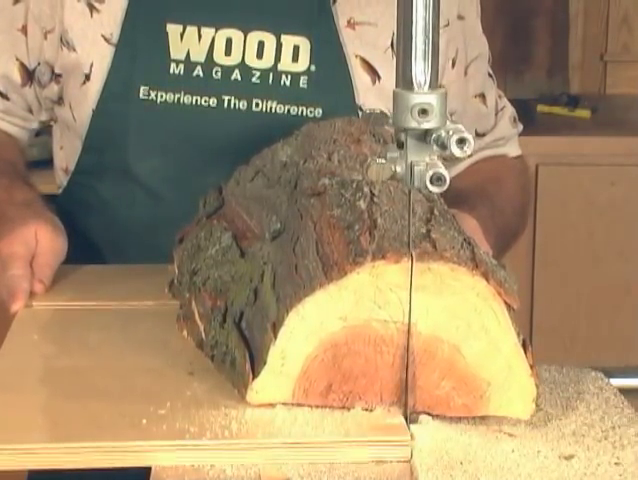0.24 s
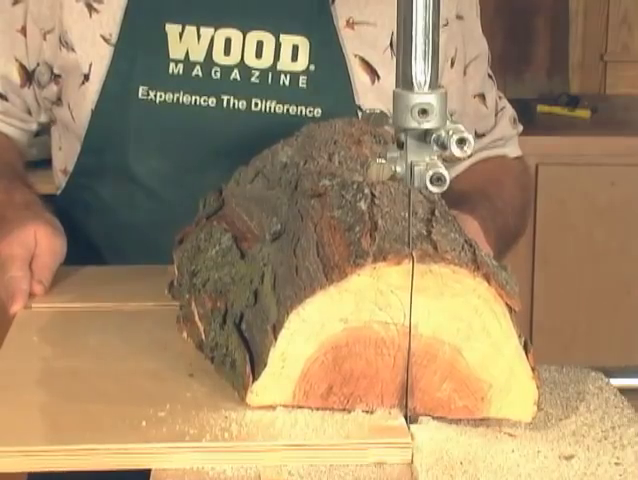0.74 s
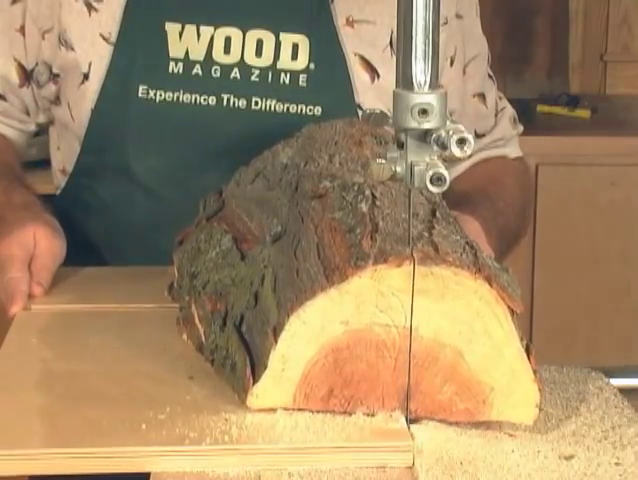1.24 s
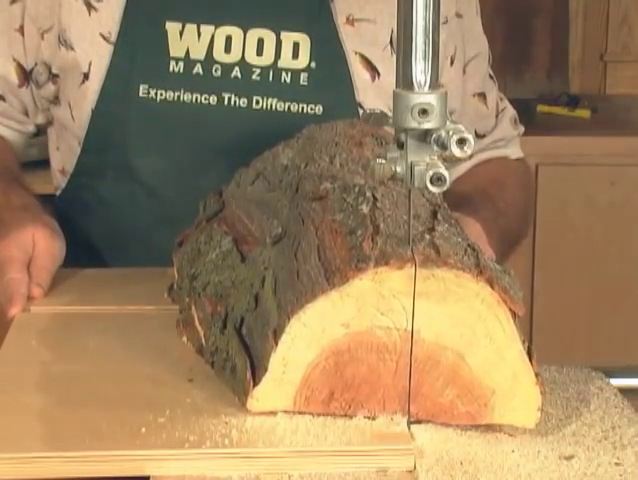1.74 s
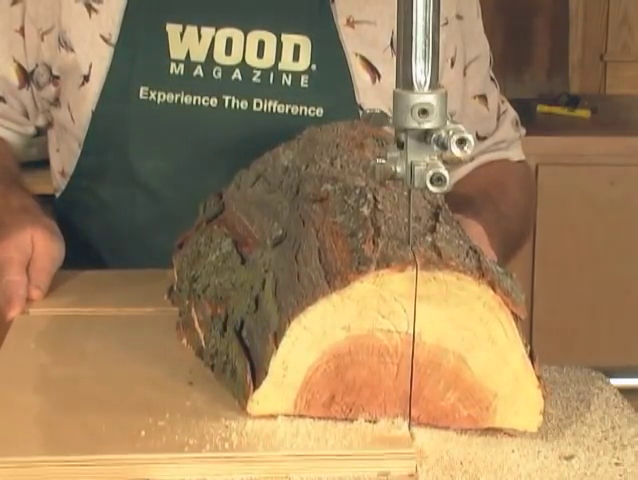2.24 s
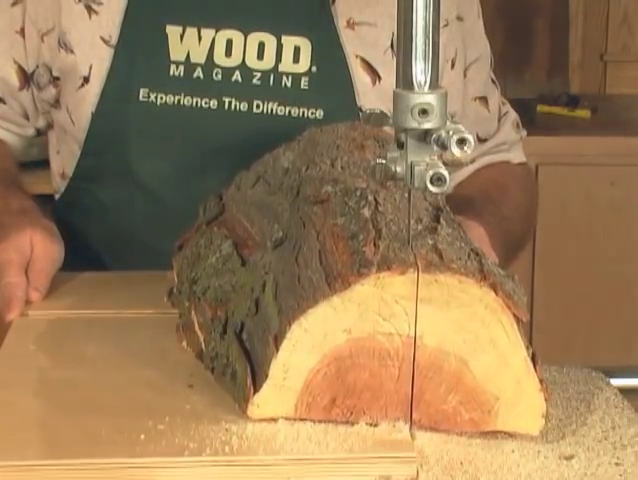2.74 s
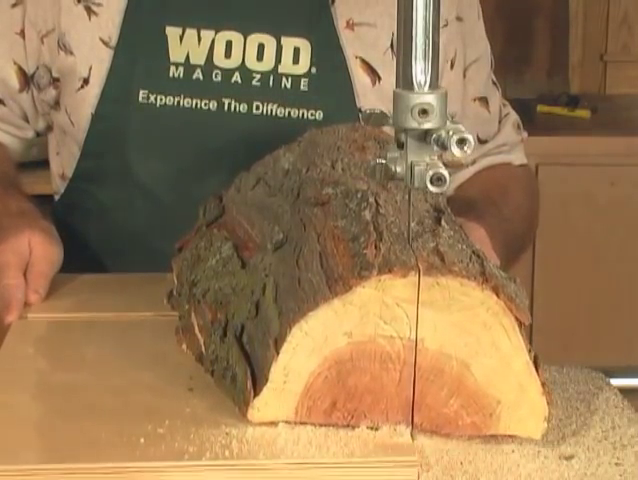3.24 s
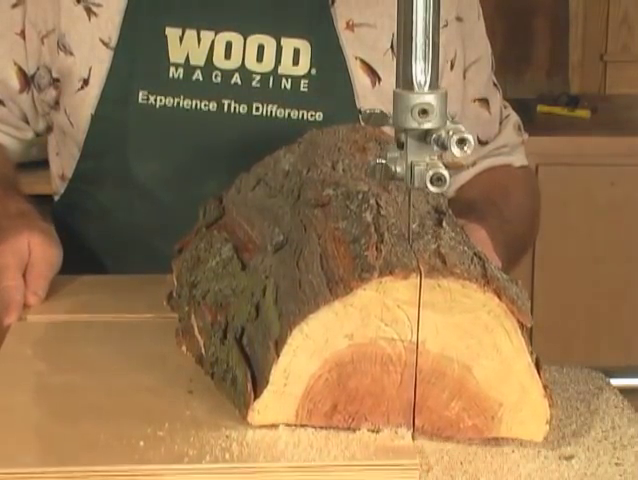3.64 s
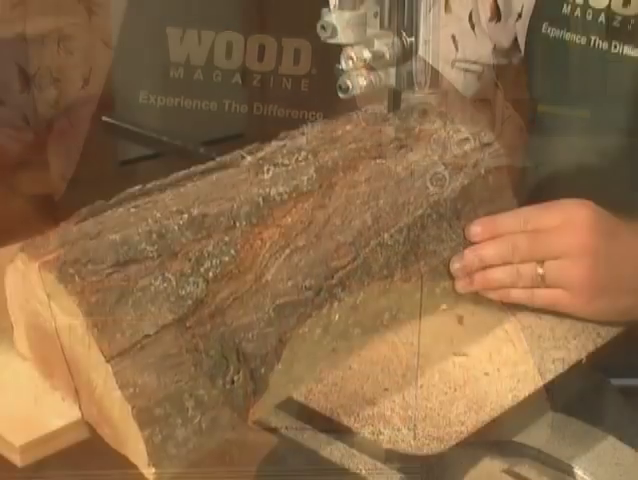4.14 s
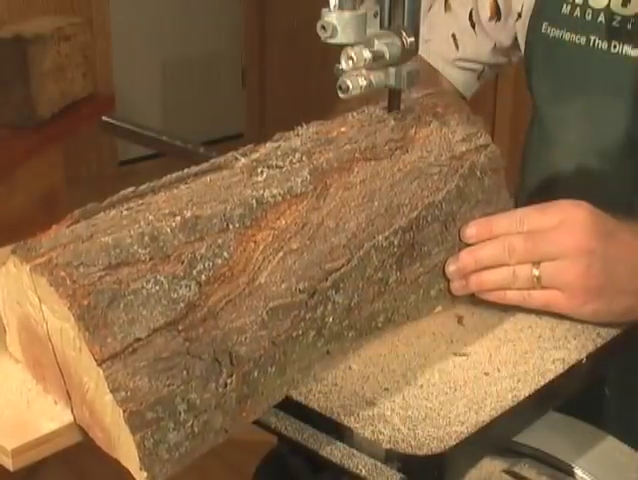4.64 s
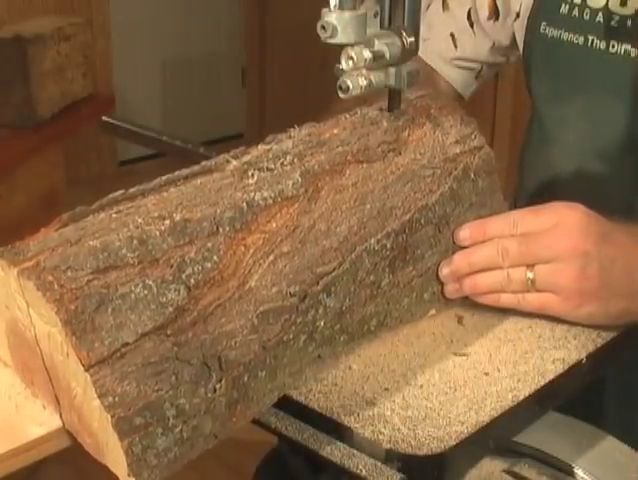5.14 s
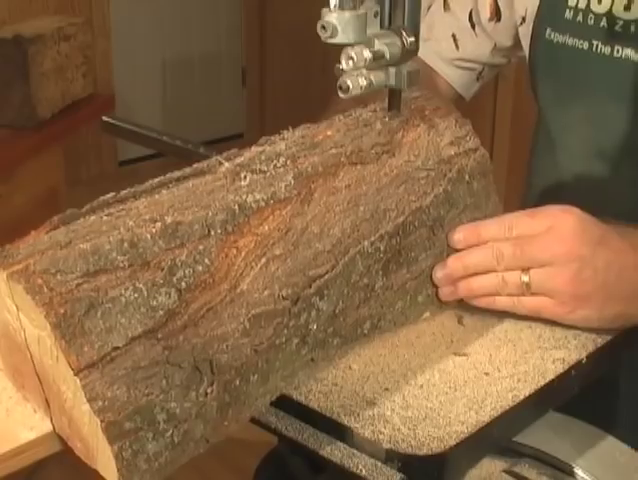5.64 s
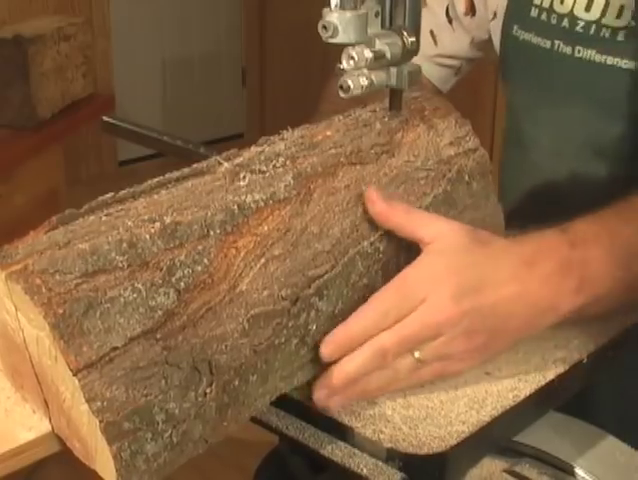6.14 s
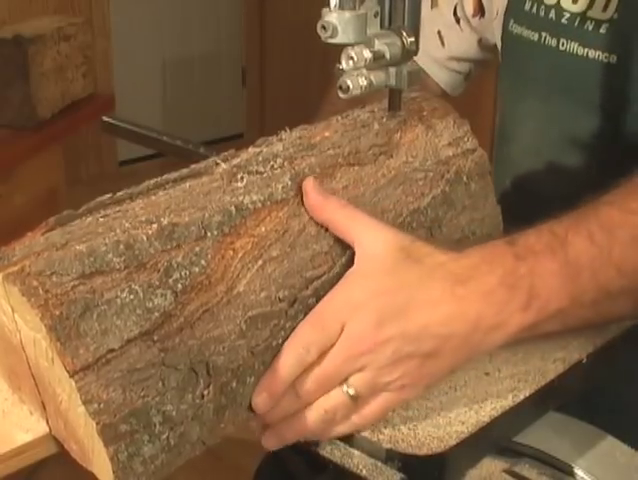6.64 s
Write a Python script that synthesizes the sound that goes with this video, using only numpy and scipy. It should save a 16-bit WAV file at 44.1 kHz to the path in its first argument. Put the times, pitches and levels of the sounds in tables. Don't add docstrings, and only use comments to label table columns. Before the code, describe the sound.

A bandsaw is already cutting a thick log at 0 s and never stops, loud and close in a small workshop, identical in both channels. Until about 4 s it is a dense, midrange-heavy roar of teeth tearing chips, with unsteady machine tones, metallic ringing and a faint throb about five times a second. Tiny splinter pings tick at 0.1, 0.4, 0.5, 2.3-2.6 and 3.1-3.6 s; a short dull table bump lands near 1.4 s. The cut swells gently with each push. From 4.0 to 4.3 s it overlaps with a second perspective: brighter, hissier and sizzling, with less body. A tooth whine climbs from 4 to 4.7 s, over faint low motor hum. Pushes keep the level wavering. Rasps of bark catch at 5.6-5.7, 6.0 and 6.3 s, with a higher fluttering whine around 6-6.2 s and a very soft bump near 6.4 s. Cutting continues to the end, about 7 s.

```python
import sys
import numpy as np
from scipy import signal
from scipy.fft import rfft, irfft, next_fast_len
from scipy.io import wavfile
from scipy.ndimage import uniform_filter1d

SR = 44100
rng = np.random.default_rng(int(sys.argv[2]) if len(sys.argv) > 2 else 0)


def persist_wave(psi):
    counts = np.round(np.clip(psi, -1, 1) * 32767).astype(np.int16)
    wavfile.write(sys.argv[1], SR, np.atleast_2d(counts).T)


def convert_level_to_amplitude(level_db):
    exponent = np.asarray(level_db, float) / 20
    return 10 ** exponent


N = 304731

FRONT_ENDS_S, SIDE_STARTS_S = 4.315, 3.975

# pitch_hz, level_db (per Hz)
FRONT_COLOUR = [(12, -64), (20, -30), (232, -23), (259, -20), (333, -13), (372, -4.5), (416, -9),
                (465, -10), (549, -8), (746, 1), (1010, -8.5), (1670, -3.5), (5540, -18.5), (8410, -22.5),
                (15500, -45)]
SIDE_COLOUR = [(12, -65), (20, -24), (119, -25.5), (274, -16.5), (372, -6), (416, -13.5), (452, -12),
               (549, -9), (789, -7), (1070, -16.5), (1580, -16), (3450, -5), (5090, -2), (10200, -2),
               (15500, -24.5)]
# pitch_hz, width_hz, level_db (over the hiss)
FRONT_MODES = [(267, 24, 2), (513.5, 8.4, 0), (720, 18, -2), (792, 29, -1.5), (834, 39, -2), (1308, 11, 1),
               (1485, 11.6, -5), (1688, 17, 4), (1724, 19, -1), (2218, 74, 2.5), (2284, 50, 4.5),
               (2946, 52, -30), (4080, 240, -2.5), (5027, 113, -2.5), (6430, 130, -0.5), (7470, 63, 6.5),
               (8400, 91, -2), (8485, 90, 9.5), (9040, 94, 8), (10840, 1700, 6.5)]
SIDE_MODES = [(467, 5.3, 13.6), (988, 16, 4.8), (1253, 63, 1.1), (1614, 77, 10.6), (1675, 24, 11),
              (1966, 130, 3), (2133.7, 26, 6.5), (3150, 51, 3), (3745, 180, 2.14), (4335, 278, 5.2),
              (4690, 130, 2), (5040, 220, 5.7), (5460, 300, 0.85), (5930, 320, 1.1), (7400, 44, 2.1),
              (7600, 69, 2.7), (8720, 320, 0.82)]
SPLIT_HZ = (560, 1050, 2700, 7000)
# front_db, side_db
IDLE_DB = (-33.5, -35)
# drone_db, bite_db
TONE_SHARE_DB = (-2.5, -0.7)

# drone_db, bite_db, hiss_db, fizz_db
FRONT_REST_DB = (-22, -18.5, -23.5, -23.5)
SIDE_REST_DB = (-27, -20.5, -20.5, -23.5)
FRONT_SINK = (0.25, 0.064, 0.45, -0.35)
SIDE_SINK = (0.046, 0.27, -0.049, -0.049)
FRONT_FEED = (.3, 1, 0.28, .3)
SIDE_FEED = (0.67, 1, 0.87, 0.25)
# middle_s, length_s, pressure_db, rattle_db
FRONT_PUSHES = [
    (.8, 0.28, 0.5, .5),
    (1.17, 0.12, 1.5, -1),
    (2.1, 0.47, -0.1, 0.5),
    (2.75, 0.27, -0.5, 1),
    (3.0, 0.41, 0.8, -1.5),
    (3.299, 0.19, -1, 1),
    (3.66, 0.16, -0.2, 0.5),
]
SIDE_PUSHES = [(4.15, 0.27, 0.38, 5), (4.46, 0.11, 2.9, -2), (4.76, 0.22, 3.3, 2), (4.97, 0.18, 3.4, 3),
               (5.16, 0.13, 1.8, 3.5), (5.39, 0.23, 3.1, 3), (5.74, 0.24, 2, 2), (6.05, 0.37, 1, 0.5),
               (6.44, 0.38, 1.2, 3), (6.799, .25, 1.9, 5), (6.92, .1, 2.2, -1)]
# turns_hz, weld_pass_s
FRONT_LOOP = (5.4, 2.44)
SIDE_LOOP = (5.6, 5.75)
WELD_DB_PER_S = (.6, .15)

# pitch_hz, unsteadiness_hz
FRONT_TONES = [(369.5, 16), (469.5, 10), (636.5, 12), (766, 14), (953.5, 10), (1521.5, 9), (1707, 12),
               (1846.5, 8), (791, 16)]
SIDE_TONES = [(370, 16), (451.5, 9), (679.5, 14), (795.5, 14), (5026, 40), (7638, 30)]
FRONT_TONES_DB = [-32, -36.5, -32, -30, -36, -35, -33.5, -37, -34]
SIDE_TONES_DB = [-34.5, -40, -34.5, -29.5, -36, -41]
# middle_s, length_s, tone_number, change_db
FRONT_SINGS = [(.58, .15, 5, 6), (.8, .45, 6, 6), (1.22, .25, 5, 7), (2.05, .3, 3, 3), (2.87, .15, 5, 7),
               (3.3, .3, 8, 4), (3.75, .4, 6, 5), (4.1, .45, 6, 7), (3.0, .5, 6, 3)]
SIDE_SINGS = [(4.45, .35, 3, -8), (4.95, .6, 3, 2), (5.4, .3, 3, 3), (5.0, .3, 2, 3), (6.2, .9, 3, -8),
              (6.2, .9, 2, -6)]

# start_s, pitch_hz, peak_db
PINGS = [(.09, 14900, -44), (.1, 7500, -24.5), (.39, 11800, -27), (.5, 8000, -14), (2.25, 4070, -15),
         (2.34, 13100, -42), (2.45, 9670, -28), (2.635, 13800, -39), (2.63, 3250, -14), (3.065, 13200, -32),
         (3.19, 13500, -43), (3.55, 11800, -30)]
# middle_s, peak_db, length_s
KNOCKS = [
    (1.356, -17, 0.0009),
    (6.38, -31.5, .003),
]
# start_s, end_s, from_hz, to_hz, level_db
WHINE_UP = (3.95, 4.68, 790, 1310, -23)
WHINE_CATCH = (5.96, 6.18, 1490, 1655, -16)
# start_s, end_s, level_db
LABOUR = [
    (3.97, 4.26, -47),
    (4.36, 4.67, -47.5),
    (4.85, 5.1, -50),
    (5.15, 5.56, -58),
    (6.32, 6.44, -60),
]
# start_s, length_s, pitch_hz, width_hz, level_db
SCRAPE = [
    (5.625, .015, 4500, 3000, -19),
    (5.722, .02, 3800, 3000, -14),
    (5.985, .018, 2150, 1100, -14),
    (6.012, .02, 2000, 1200, -15),
    (6.265, .02, 1950, 900, -18),
    (6.295, .025, 2000, 900, -18),
]
# start_s, end_s, pitch_hz, width_hz, change_db
SHADING = [(-.2, 1.0, 6680, 2700, 2.5), (4.65, 5.45, 15000, 5000, 4), (5.45, 5.65, 14000, 3000, -2),
           (6, 6.7, 3040, 1000, -3.5), (6.15, 6.6, 9900, 1300, -5), (6.2, 7.1, 8200, 500, 3),
           (6.0, 6.65, 14500, 2000, 0), (6.65, 7.1, 14000, 500, 6.5), (6.65, 7.1, 11200, 1200, 4),
           (4.05, 4.65, 10730, 500, 1), (7, 7.1, 4950, 600, 4), (5, 5.47, 4600, 2200, 1.5),
           (6.3, 6.7, 3240, 600, -2.5)]


def evened(x):
    return x / np.sqrt(np.mean(np.abs(x) ** 2) + 1e-20)


def drift(top_hz, low_hz):
    step = 64
    count = next_fast_len(N // step + 2)
    hz = np.fft.rfftfreq(count, step / SR)
    z = rfft(rng.standard_normal(count)) * (hz > low_hz)
    z = z / np.sqrt(hz + low_hz) / (1 + (hz / top_hz) ** 4)
    return np.interp(np.arange(N) / step, np.arange(count), evened(irfft(z, count)))


def bell(t, middle_s, length_s):
    return np.exp(-(2 * (t - middle_s) / length_s) ** 2)


def colour_db(points, hz):
    point_hz, level_db = np.transpose(points)
    return np.interp(np.log(hz + 1), np.log(point_hz + 1), level_db)


def ring(x, hz, width):
    r = np.exp(-np.pi * width / SR)
    w = 2 * np.pi * hz / SR
    gain = (1 - r * r) / 2
    return signal.lfilter([gain, 0, -gain], [1, -2 * r * np.cos(w), r * r], x)


def cut(rest_db, sink, feed, pushes, start, loop, weld_db_per_s):
    t = np.arange(N) / SR
    shapes = [bell(t, s, length) for s, length, _, _ in pushes]
    pressure_db, rattle_db = np.transpose(pushes)[2:] @ shapes
    drone, bite, hiss, fizz = (
        db + per_s * (t - start) + share * pressure_db
        for db, per_s, share in zip(rest_db, sink, feed))
    loop_hz, weld_s = loop
    thump_db = weld_db_per_s * (t - start) * np.cos(2 * np.pi * loop_hz * (t - weld_s))
    return drone + rattle_db + thump_db, bite, hiss, fizz


def teeth(tooth_hz, spread_db, share):
    tooth = (np.cumsum(np.full(N, tooth_hz / SR)) + rng.random()).astype(int)
    chip_size = convert_level_to_amplitude(spread_db * rng.standard_normal(tooth[-1] + 1))[tooth]
    share = np.clip(share, 0, 1)
    return rng.standard_normal(N) * evened(share * evened(chip_size) + 1 - share)


def loop_throb(loop_hz, weld_s):
    turns = (np.arange(N) / SR - weld_s) * loop_hz
    bump = np.exp(2.0 * np.cos(2 * np.pi * turns))
    turn_strength = np.clip(1 + 0.84 * drift(1.2, 0.35), 0, 2)
    return evened(bump - bump.mean()) * turn_strength


def saw(cut_db, colour, modes, idle_db, tooth_hz, loop_hz, weld_s, throb_db, flicker_db, waver_db):
    noise = teeth(tooth_hz, spread_db=2.0, share=0.49)
    shaking = rng.standard_normal(2 * N)
    for k, (hz, width, db) in enumerate(modes):
        drive = shaking[k * 9000:][:N]
        noise = noise + convert_level_to_amplitude(db + waver_db * drift(15.0, 1.1)) * ring(drive, hz, width)

    size = next_fast_len(N, True)
    hz = np.fft.rfftfreq(size, 1 / SR)
    z = rfft(noise, size) * convert_level_to_amplitude(colour_db(colour, hz))
    above = [1] + [1 / (1 + (edge / (hz + 1)) ** 10) for edge in SPLIT_HZ] + [0]
    drone, bite, hiss, fizz = cut_db
    levels_db = (idle_db, drone + TONE_SHARE_DB[0], bite + TONE_SHARE_DB[1], hiss, fizz)
    shake_db = throb_db * loop_throb(loop_hz, weld_s) + flicker_db * drift(40.0, 3.8)
    out = np.zeros(N)
    for k, depth in enumerate((0.05, 0.19, 0.82, 0.85, 0.6)):
        part = evened(irfft(z * (above[k] - above[k + 1]), size)[:N])
        out += part * convert_level_to_amplitude(levels_db[k] + depth * (shake_db + 0.83 * drift(63.0, 7.4)))
    return out


def unsteady(hz, blur_hz, steady):
    angle = 2 * np.pi * np.cumsum(hz * np.ones(N)) / SR
    in_step = drift(blur_hz, blur_hz / 4)
    off_step = drift(blur_hz, blur_hz / 4)
    return evened((steady + in_step) * np.cos(angle) + off_step * np.sin(angle))


def tones(rows, levels_db, drone_db, sings, steady):
    t, out = np.arange(N) / SR, np.zeros(N)
    for k, ((hz, blur_hz), db) in enumerate(zip(rows, levels_db)):
        for s, length, tone, change_db in sings:
            if tone == k:
                db = db + change_db * bell(t, s, length)
        if SPLIT_HZ[0] < hz < SPLIT_HZ[1]:
            db = db + 1.14 * drone_db
        out += convert_level_to_amplitude(db) * unsteady(hz, blur_hz, steady)
    return out


def pings():
    t, out = np.arange(2000) / SR, np.zeros(N)
    for s, hz, db in PINGS:
        out[round(s * SR):][:len(t)] += convert_level_to_amplitude(db) * np.sin(2 * np.pi * hz * t) * np.exp(-t / 0.006)
    return out


def knocks():
    t = np.arange(N) / SR
    return sum(convert_level_to_amplitude(db) * bell(t, s, length) for s, db, length in KNOCKS)


def whine(glide, bend, fade_db, beat_hz, beat_db, blur_hz, steady):
    start, end, from_hz, to_hz, db = glide
    t = np.arange(N) / SR
    progress = np.clip((t - start) / (end - start), 0, 1)
    pulse_db = beat_db * (np.cos(2 * np.pi * beat_hz * (t - start)) - 1)
    level_db = db + fade_db * progress ** 2 + pulse_db
    fade = np.clip(np.minimum(t - start, end - t) / 0.048, 0, 1)
    pitch_hz = from_hz + (to_hz - from_hz) * progress ** bend
    return unsteady(pitch_hz, blur_hz, steady) * convert_level_to_amplitude(level_db) * fade


def motor():
    hum_hz, rest_db, swell_s = 120.4, -61, 0.08
    t = np.arange(N) / SR
    load = sum(convert_level_to_amplitude(db) * np.clip(np.minimum(t - a, b - t) / swell_s + 0.5, 0, 1) for a, b, db in LABOUR)
    return np.sqrt(2) * np.sin(2 * np.pi * hum_hz * t) * (convert_level_to_amplitude(rest_db) + load)


def scrape():
    grit, out = rng.standard_normal(N), np.zeros(N)
    for s, length, hz, width, db in SCRAPE:
        t = np.arange(N) / SR - s
        shape = np.clip(t / 0.0024, 0, 1) * np.exp(-np.abs(t) / length)
        out += convert_level_to_amplitude(db) * evened(ring(grit, hz, width)) * shape
    return out


def workshop(x, ripple_db, patchy_db):
    hz, t, z = signal.stft(x, SR, nperseg=1024, noverlap=768)
    high = np.clip(hz / 7000, 0.1, 2.2)[:, None]
    field_db = ripple_db * high * rng.standard_normal((len(hz), 1))
    patches = rng.standard_normal((len(t), len(hz))).T
    patches = uniform_filter1d(patches, size=11, axis=0)
    patches = uniform_filter1d(patches, size=4, axis=1)
    field_db = field_db + patchy_db * high * evened(patches)
    for start, end, centre_hz, width_hz, db in SHADING:
        present = np.clip(np.minimum(t - start, end - t) / 0.079 + 0.5, 0, 1)
        field_db += db * bell(hz[:, None], centre_hz, width_hz) * present
    return signal.istft(z * convert_level_to_amplitude(field_db), SR, nperseg=1024, noverlap=768)[1][:N]


def scene():
    t = np.arange(N) / SR
    front_db = cut(FRONT_REST_DB, FRONT_SINK, FRONT_FEED, FRONT_PUSHES, 0, FRONT_LOOP, WELD_DB_PER_S[0])
    front = saw(front_db, FRONT_COLOUR, FRONT_MODES, IDLE_DB[0], 1705, *FRONT_LOOP,
                throb_db=0.23, flicker_db=0.5, waver_db=0.25)
    front += tones(FRONT_TONES, FRONT_TONES_DB, front_db[0] + 21.0, FRONT_SINGS, steady=1.3)

    side_db = cut(SIDE_REST_DB, SIDE_SINK, SIDE_FEED, SIDE_PUSHES, SIDE_STARTS_S, SIDE_LOOP,
                  WELD_DB_PER_S[1])
    side = saw(side_db, SIDE_COLOUR, SIDE_MODES, IDLE_DB[1], 1617, *SIDE_LOOP,
               throb_db=0.03, flicker_db=0.5, waver_db=2.0)
    side += tones(SIDE_TONES, SIDE_TONES_DB, side_db[0] + 25.0, SIDE_SINGS, steady=0.57)
    side += whine(WHINE_UP, bend=0.55, fade_db=-6, beat_hz=5, beat_db=0.5, blur_hz=60, steady=0.9)
    side += whine(WHINE_CATCH, bend=0.9, fade_db=-5, beat_hz=18, beat_db=4, blur_hz=30, steady=1.5)
    side += motor() + scrape()

    front_fade = np.clip((FRONT_ENDS_S - t) / 0.0044, 0, 1)
    side_fade = np.clip((t - SIDE_STARTS_S) / 0.047, 0, 1)
    room = workshop(front * front_fade + side * side_fade, ripple_db=1.2, patchy_db=0.92)
    return np.tile(room + knocks() + pings(), (2, 1))


def top_cut(x):
    return signal.sosfilt(signal.butter(12, 15660, fs=SR, output="sos"), x)


def record(dry):
    mix = np.clip(dry, -0.96, 0.96)
    return top_cut(mix)


dry = scene()
out = record(dry)
persist_wave(out)
```